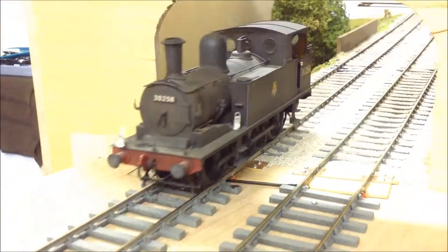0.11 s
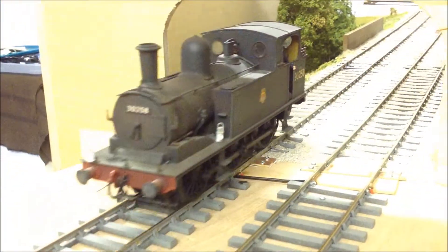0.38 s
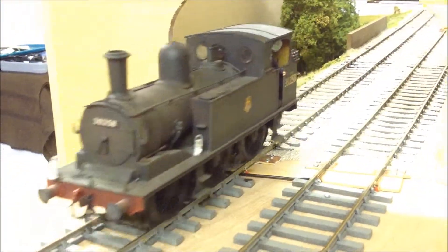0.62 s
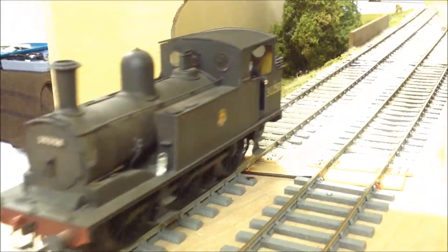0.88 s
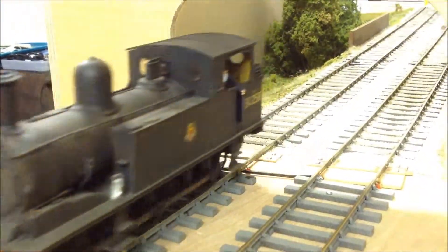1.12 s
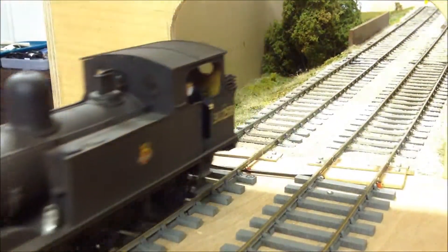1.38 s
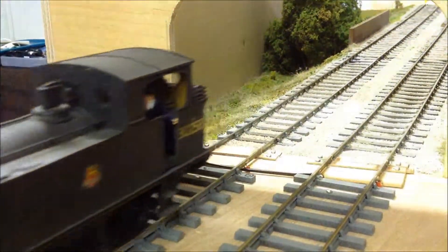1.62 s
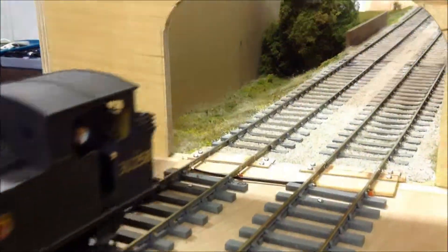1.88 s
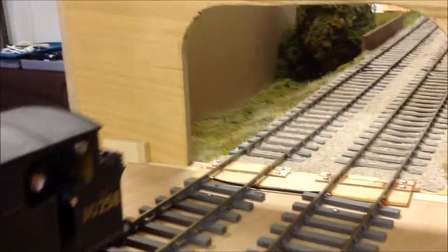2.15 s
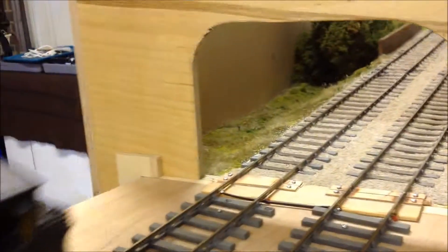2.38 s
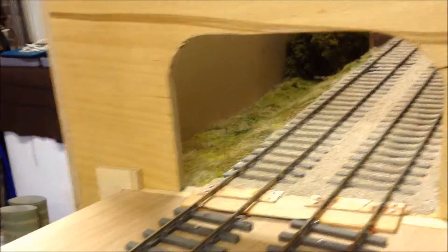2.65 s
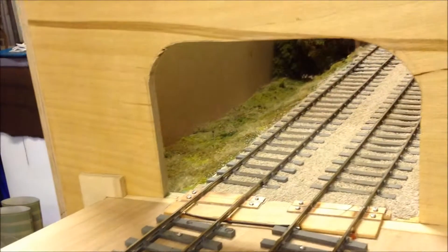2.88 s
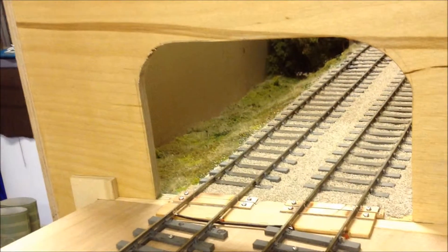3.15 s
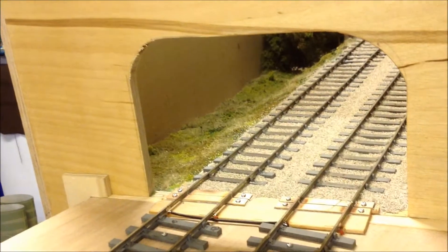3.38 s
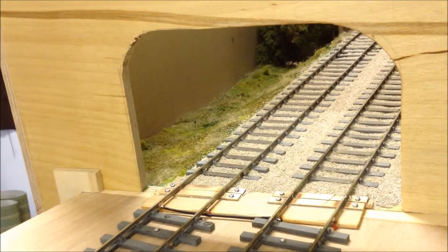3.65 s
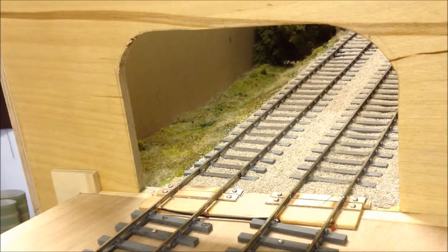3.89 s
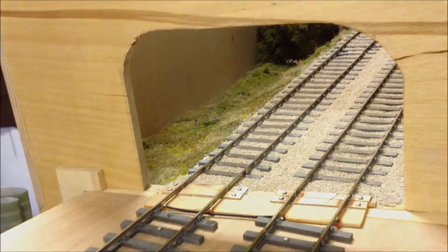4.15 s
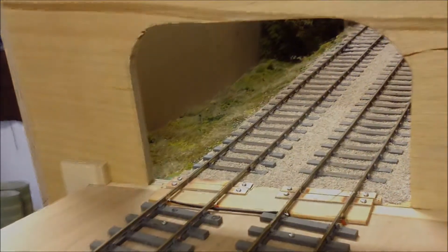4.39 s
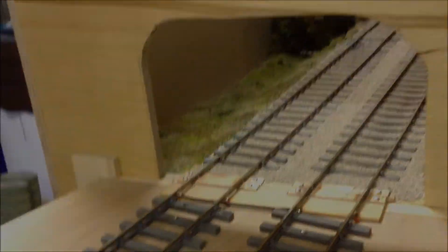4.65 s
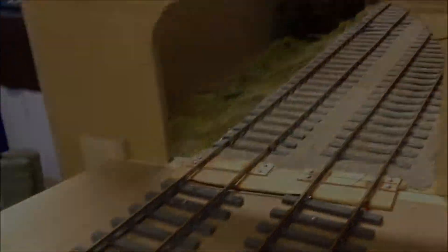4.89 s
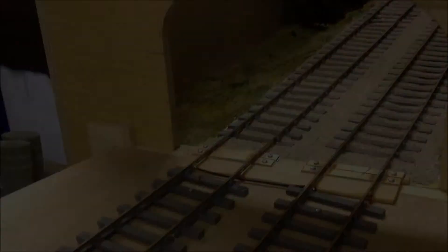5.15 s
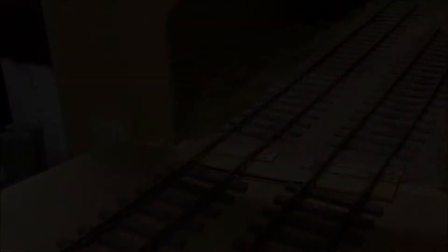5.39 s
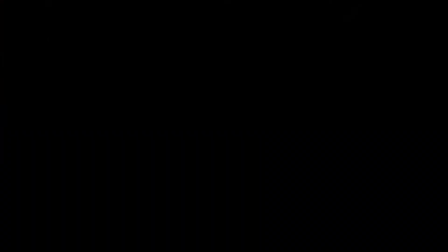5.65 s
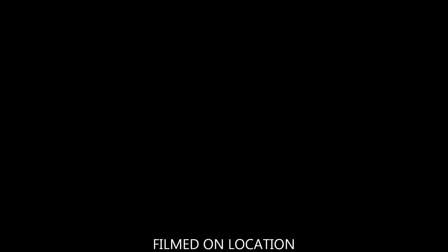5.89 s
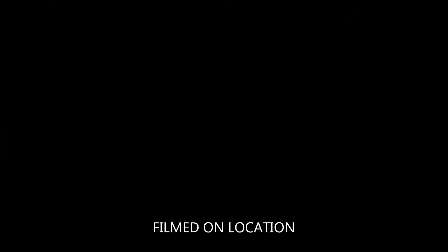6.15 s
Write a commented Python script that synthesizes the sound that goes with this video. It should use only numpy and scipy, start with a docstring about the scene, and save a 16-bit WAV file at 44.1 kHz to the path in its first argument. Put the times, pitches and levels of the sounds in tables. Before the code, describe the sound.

A small model locomotive rumbles close by on hollow wooden boards, wheels clicking over rail joints with brief thin squeals, then fades and cuts to silence.

```python
"""On a plywood layout, a small model locomotive rolls past close to a camera.
Its motor knocks make the boards throb and boom; its metal wheels are noise that rings at their own pitches.
Sine tones make the squeals and whines, and short noise bursts make the clicks at rail joints.
A low hum of sine waves, soft scuffs, treble hiss and room boom lie behind.
The sound fades and is then cut off."""
import sys
import numpy as np
from scipy import signal
from scipy.fft import rfft, irfft, next_fast_len
from scipy.io import wavfile
from scipy.ndimage import uniform_filter1d, map_coordinates

SR = 44100
rng = np.random.default_rng(int(sys.argv[2]) if len(sys.argv) > 2 else 0)


def file_out(sig):
    """Save sig as 16-bit WAV at sys.argv[1]."""
    # one column per channel
    cols = np.atleast_2d(sig).T
    # limit, then scale
    lim = np.clip(cols, -1, 1)
    pcm = np.round(lim * 32767).astype(np.int16)
    wavfile.write(sys.argv[1], SR, pcm)


def gain_from_db(level_db):
    """Turn a decibel level (scalar or array-like) into a linear amplitude factor."""
    decades = np.asarray(level_db, float) / 20
    return 10 ** decades


N = 276948  # length in samples

# how strongly the engine is heard as it nears, passes and leaves:
# (t/s, level/dB of the rolling noise between 800 and 2200 Hz)
PASSING = [(0.0, -57.5), (0.28, -57.5), (0.39, -55.5), (0.89, -57.5), (1.28, -58), (1.53, -59),
           (1.88, -56.5), (2.19, -54), (2.36, -56.5), (2.58, -52.5), (2.84, -53), (3.03, -54), (3.34, -56),
           (3.8, -52.5), (4.33, -60.5), (5.55, -65)]


def unit(x):
    """Scales a sound to rms 1."""
    return x / np.sqrt(np.mean(x ** 2) + 1e-20)


def along(points, hz):
    """Reads a curve of (f/Hz, value) points, with frequency on a log axis."""
    f, v = np.transpose(points)
    return np.interp(np.log(hz + 1), np.log(f + 1), v)


def curves(rows):
    """Gives one value per sample for each column after the time."""
    times, *columns = np.transpose(rows)
    return [np.interp(np.arange(N) / SR, times, column) for column in columns]


def wobble(rate):
    """A smooth random curve through rate random points a second."""
    points = rng.standard_normal(int(N * rate / SR) + 4)
    return map_coordinates(points, [np.arange(N) * rate / SR])


def filtered(x, response):
    """Changes each frequency of x by a response, a function of frequency in Hz."""
    m = next_fast_len(N + SR // 2)
    return irfft(rfft(x, m) * response(np.fft.rfftfreq(m, 1 / SR)), m)[..., :N]


def modes(table):
    """Response of objects that ring at (f/Hz, width/Hz, gain/dB), with alternating signs."""
    def response(f):
        total = 0
        for k, (centre, width, db) in enumerate(table):
            total = total + (-1) ** k * gain_from_db(db) * 1j * f * width / (centre * centre - f * f + 1j * f * width)
        return total
    return response


def unit_in(x, low_hz, high_hz):
    """Scales a sound so that one frequency band has rms 1."""
    return x / np.std(filtered(x, lambda f: (f > low_hz) & (f < high_hz)))


def patchy(patchy_db):
    """White noise whose strength varies in random patches of time and frequency."""
    z = signal.stft(rng.standard_normal(N), nperseg=512)[2]
    patches = uniform_filter1d(rng.standard_normal(z.shape), 5, 0)
    patches = uniform_filter1d(patches, 8, 1)
    return signal.istft(z * gain_from_db(patchy_db * unit(patches)), nperseg=512)[1][:N]


def follows(db, slope):
    """Level in dB that swings with the pass: db at a rolling level of -57 dB, slope dB per dB around it."""
    return db + slope * (curves(PASSING)[0] + 57)


def bump(middle, length):
    """A smooth swell from 0 to 1 and back."""
    return np.cos(np.pi * np.clip((np.arange(N) / SR - middle) / length, -.5, .5)) ** 2


def room(x):
    """The room answers with a noise tail in which each frequency dies at its own speed."""
    # time to fall by 60 dB: (f/Hz, t60/s)
    decay_times = [(200, 0.92), (2000, 0.37), (10000, 0.054)]
    hz, t, z = signal.stft(rng.standard_normal(SR // 2), SR, nperseg=256)
    fall = gain_from_db(-60 * t / along(decay_times, hz)[:, None])
    tail = signal.istft(z * fall, SR, nperseg=256)[1]
    delayed = np.pad(x, (200, 0))  # 200 samples late
    return signal.fftconvolve(delayed, tail / np.linalg.norm(tail))[:N]


def hum():
    """A low buzz: sine waves at multiples of one pitch, each slightly unsteady, rise and fall with the pass."""
    # mix of the sine waves: (multiple of 49 Hz, relative level/dB)
    multiples = [(1, -37), (2, -18), (3, -4.5), (4, 2.5), (5, 5.5), (6, -0.5), (7, -7), (8, 6.5), (9, 1.5),
                 (10, -14.5), (11, 7.5), (12, 3.5), (13, 3), (14, -13.5), (15, -22), (16, -32.5), (17, -14),
                 (18, -11)]
    phase = 2 * np.pi * 49 * np.arange(N) / SR
    lines = np.zeros(N)
    for k, db in multiples:
        lines += gain_from_db(db + 1.0 * wobble(1.5)) * np.sin(k * phase + rng.uniform(0, 2 * np.pi))
    return gain_from_db(follows(-55, 0.44)) * unit(lines)


def room_boom():
    """Low noise wavers in level and swells gently with the pass."""
    # colour of the boom: (f/Hz, relative level/dB)
    boom_colour = [(15, -61.5), (25, -34.5), (38, -30.5), (64, -6.5), (97, -0.5), (130, 0), (170, -29.5),
                   (290, -120)]
    boom = filtered(rng.standard_normal(N), lambda f: gain_from_db(along(boom_colour, f)))
    return gain_from_db(follows(-73, 0.49) + 2.5 * wobble(5.9)) * unit(boom)


def treble_hiss(sizzle):
    """Flickering high noise follows the pass and gains strength while a wheel drags."""
    # colour of the hiss: (f/Hz, relative level/dB)
    hiss_colour = [(2940, -28.5), (5000, -30.5), (7040, -12), (8930, -8.5), (9630, -4), (13400, -0.5),
                   (15300, -3)]
    flickering = patchy(patchy_db=-0.6) * gain_from_db(1.1 * wobble(300))
    hiss = filtered(flickering, lambda f: gain_from_db(along(hiss_colour, f)))
    return (gain_from_db(follows(-69, 0.41)) + sizzle) * unit_in(hiss, 10600, 12200)


def scuffs():
    """Short brushes of noise with a quick rise and a slower fall."""
    # soft scuffs: (t/s, length/s, middle level/dB, treble level/dB)
    brushes = [(0.233, .12, -59, -67.5), (3.202, 0.09, -51.5, -46), (4.71, 0.15, -57, -58.5),
               (4.5, 0.036, -61, -62.5), (1.79, .05, -54, -68.5), (2.04, 0.1, -51, -60.5)]
    t, levels = np.arange(N) / SR, np.zeros((2, N))
    for start, length, *levels_db in brushes:
        u = np.clip((t - start) / length, 0, None) * 4  # the peak comes at u = 1
        levels += gain_from_db(np.array(levels_db))[:, None] * u * np.exp(1 - u)
    middle = unit(filtered(patchy(patchy_db=-3.5), modes([(2365, 520, 3.0), (4490, 4800, -7.5)])))
    treble = unit(filtered(patchy(patchy_db=3.0), lambda f: modes([(12500, 6000, 0)])(f) ** 2))
    return levels[0] * middle + levels[1] * treble


def whines():
    """Thin whines of gears and wheels: sines that swell and die, wavering a little in pitch and strength."""
    # whines before wavering: (start t/s, end t/s, f/Hz, level/dB)
    thin_tones = [(0, 0.08, 1620, -62), (.1, 0.616, 993, -63), (0.89, 1.136, 201, -58),
                  (1.113, 1.485, 1614, -60), (1.15, 1.599, 3670, -69.5), (1.18, 1.556, 6200, -61.5),
                  (2.261, 2.363, 950, -75), (2.43, 2.665, 1008, -56.5), (2.8, 3, 3700, -63),
                  (3.694, 3.92, 1080, -59.5), (4.15, 4.604, 1445, -69), (4.253, 4.547, 3700, -75)]
    t, out = np.arange(N) / SR, np.zeros(N)
    for start, end, hz, db in thin_tones:
        progress = np.clip((t - start) / (end - start), 0, 1)
        swell = np.sqrt(np.sin(np.pi * progress).clip(0))
        phase = 2 * np.pi * hz * np.cumsum(1 + 0.0033 * wobble(60)) / SR
        out += gain_from_db(db + 2.1 * wobble(45)) * swell * np.sqrt(2) * np.sin(phase)
    return out


def rolling_noise():
    """Broad, slightly patchy noise of the rolling wheels, at the level of the pass."""
    # colour of the rolling: (f/Hz, relative level/dB)
    rolling_colour = [(82, -40.5), (140, -14.5), (195, -0.5), (391, -2), (412, -9), (526, -2.5), (772, -7),
                      (1450, -11.5), (3220, -20.5), (5240, -24.5), (9000, -27.5), (11700, -46),
                      (19800, -120)]
    roll = filtered(patchy(patchy_db=2.0), lambda f: gain_from_db(along(rolling_colour, f)))
    return gain_from_db(curves(PASSING)[0]) * unit_in(roll, 800, 2200)


def drags():
    """Strength of the extra rub and of the extra treble hiss while a wheel drags."""
    # drags: (middle t/s, length/s, rub level/dB, treble hiss level/dB)
    drag_times = [(.76, 0.25, -61, -68), (1.233, 0.22, -70.5, -71), (1.367, 0.78, -62, -85.5),
                  (1.96, 1, -70.5, -72.5), (2.39, 0.4, -62.5, -69), (2.682, 0.48, -102, -62),
                  (3.211, 0.22, -61.5, -68.5), (4.01, 0.45, -67.5, -70.5), (4.3, 0.67, -90, -73.5),
                  (4.776, 0.54, -90, -65.5), (5.004, .5, -99, -76)]
    strengths = np.zeros((2, N))
    for middle, length, rub_db, hiss_db in drag_times:
        strengths += gain_from_db([[rub_db], [hiss_db]]) * bump(middle, length)
    return strengths


def rubbing(drag):
    """Gritty rubbing noise rings the wheels and one thin rim tone; a dragging wheel strengthens both."""
    # wheel resonances: (f/Hz, width/Hz, relative gain/dB)
    wheel_modes = [(1430, 61, 1), (1620, 7.5, 8), (2479, 94, 3), (3680, 50, -4), (3920, 140, -8.5),
                   (5126, 410, -1.5), (6295, 430, -3.5), (9870, 170, -7)]
    rub = filtered(patchy(patchy_db=3) * gain_from_db(1.3 * wobble(60)), modes(wheel_modes))
    rim = filtered(patchy(patchy_db=6.5), modes([(3700, 76, 0)]))
    rub_level = gain_from_db(follows(-71, 1.05)) + drag
    rim_level = gain_from_db(follows(-72.5, 1.4)) + gain_from_db(-12.5) * drag
    return rub_level * unit_in(rub, 5700, 6800) + rim_level * unit(rim)


def boards():
    """The motor knocks the plywood: two board resonances all along, and loose stretches that boom up in passing."""
    # motor speed before a slight waver: (t/s, knock rate f/Hz)
    motor_speed = [(0, 49.66), (1.55, 49.3), (1.72, 52.5), (1.9, 49.73), (2.43, 49.6), (2.7, 51.7),
                   (2.95, 49.9), (3.68, 50.23), (3.9, 48.36), (3.98, 49.93), (4.13, 49), (5.7, 49)]
    # loose boards under the engine: (middle t/s, length/s, level/dB, resonance f/Hz)
    loose_boards = [(.1, 0.74, -61.5, 158), (0.278, 0.093, -48, 418), (0.616, 0.29, -53.5, 207),
                    (0.844, 0.19, -53, 320), (1.002, .3, -64, 190), (1.78, 0.31, -55, 212),
                    (2.0, 0.61, -49.5, 236), (2.265, .12, -49, 570), (2.6, 0.51, -41, 535),
                    (2.617, 0.21, -50, 270), (2.823, 0.28, -55, 505), (2.912, .1, -44, 460),
                    (2.96, 0.86, -49, 290), (2.951, 1, -58, 200), (3.196, 0.25, -46.5, 272),
                    (3.621, 1, -53, 240), (3.722, 0.59, -57, 395), (3.785, 0.34, -45.5, 560),
                    (4.074, 0.12, -51, 315)]
    deep_hz, upper_hz = 253, 454
    turns = np.cumsum(curves(motor_speed)[0] * (1 + .003 * wobble(12))) / SR
    new_turn = np.diff(np.floor(turns), prepend=0) > 0
    knocks = unit(new_turn * gain_from_db(1.2 * wobble(43)))
    knock_share = .85  # the rest of the driving power is patchy noise
    drive = np.sqrt(knock_share) * knocks + np.sqrt(1 - knock_share) * patchy(patchy_db=5.0)

    def ring(hz, width_hz):
        return unit(filtered(drive, lambda f: 1 / (1 + (2 * (f - hz) / width_hz) ** 2) ** 2))

    out = gain_from_db(follows(-64.5, 1.5) + 1.5 * wobble(7)) * ring(deep_hz, width_hz=150)
    out += gain_from_db(follows(-61.5, 1.6) + 1.5 * wobble(7)) * ring(upper_hz, width_hz=300)
    for middle, length, db, hz in loose_boards:
        width_hz = np.interp(hz, [deep_hz, upper_hz], [44, 144])  # higher booms are broader
        out += gain_from_db(db) * bump(middle, length) * ring(hz, width_hz)
    return out


def joints():
    """Each wheel drop gives a knock, a thud in the boards, a ring of the rim and a thin spit; a tick is mostly spit."""
    # rail joints, strength of the blow before it rings: (t/s, knock/dB, thud/dB, ring/dB, t60/s)
    rail_joints = [(0.2146, -35.5, -46.5, -43, 0.05), (.6395, -34.5, -60, -49.5, 0.017),
                   (0.657, -35.5, -52.5, -44.5, 0.021), (1.5943, -28.5, -61, -45, 0.01),
                   (1.6166, -15.5, -40.5, -28, 0.031), (1.6844, -49, -46, -63.5, 0.0081),
                   (1.7202, -26, -31.5, -52.5, 0.014), (1.981, -29, -36, -37.5, 0.02),
                   (2.391, -38.5, -47, -48.5, 0.04), (2.737, -39, -40, -60, 0.049),
                   (3.0784, -54, -58, -66, 0.014), (3.1877, -47, -39.5, -54, 0.029),
                   (3.3877, -62, -47.5, -49, 0.024), (3.4697, -60, -72, -70, 0.0084),
                   (3.5501, -36.5, -40.5, -59.5, 0.02), (4.0617, -53, -40.5, -47.5, 0.027),
                   (5.5932, -45, -47.5, -69, 0.014)]
    # thin high ticks, strength before ringing: (t/s, spit/dB)
    thin_ticks = [(1.9573, -40), (2.6392, -53), (4.2643, -55), (4.783, -60)]
    # resonances of the knock, the boards and the rim: each (f/Hz, width/Hz, gain/dB)
    knock_modes = [(970, 170, 9.5), (1350, 160, 16), (1934, 760, 12)]
    board_modes = [(301, 220, 17), (500, 200, 27.5)]
    rim_modes = [(2400, 43, 7), (3580, 950, 17), (5500, 1100, 20.5), (6550, 2700, 14.5)]
    t = np.arange(SR // 5) / SR
    blows = np.zeros((4, N + SR))  # rows: knock, thud, ring, spit
    drops = [(s, [knock, thud, ring, ring - 14], t60) for s, knock, thud, ring, t60 in rail_joints]
    ticks = [(s, [db - 11, db - 3, db - 18.5, db], 0.019) for s, db in thin_ticks]
    for start, levels_db, t60 in drops + ticks:
        burst = rng.standard_normal((4, len(t))) * gain_from_db(-60 * t / max(t60, .004))
        burst[1, 0] += 6 * np.sign(burst[1, 0])  # the boards take one firm push
        first = round(start * SR)
        blows[:, first:first + len(t)] += gain_from_db(np.array(levels_db))[:, None] * burst

    def dull(f):  # softens the treble
        return 1 / (1 + 1j * f / 3000) ** 2

    def high(f, hz):  # thins out what lies below hz
        return (1j * f / hz / (1 + 1j * f / hz)) ** 2

    knock = filtered(blows[0, :N], lambda f: modes(knock_modes)(f) * dull(f) * high(f, 460))
    thud = filtered(blows[1, :N], lambda f: modes(board_modes)(f) * dull(f) * high(f, 100))
    ring = filtered(blows[2, :N], lambda f: modes(rim_modes)(f) * high(f, 2300) / (1 + 1j * f / 8000) ** 2)
    spit = filtered(blows[3, :N], lambda f: modes([(12200, 3500, 8.5)])(f) ** 2)
    return knock + thud + ring + spit


def squeal():
    """A wheel flange sticks and slips at a wheel mode: two clear partials, the higher ones blurred."""
    # the flange grips, often twice in a row: (start t/s, hold/s, level/dB, octave over it/dB)
    grips = [(0.649, 0.015, -47.5, -17), (0.677, 0.0097, -57, 13), (.715, 0.074, -44, -3.5),
             (0.827, 0.042, -56, -3), (1.57, 0.06, -56, -12.5), (1.645, 0.043, -50, -6.5),
             (2.303, 0.041, -40, 2.5), (2.361, 0.078, -34, -8), (2.48, .02, -52.5, -7),
             (2.838, .01, -61, -17.5), (2.909, .01, -57, -26), (3.151, 0.034, -44.5, -7),
             (3.211, 0.013, -47, 5), (3.282, 0.017, -51.5, -23), (3.772, 0.0079, -54.5, -11),
             (3.879, 0.075, -33, -7.5), (3.985, 0.06, -36.5, -7), (4.086, 0.014, -49.5, -3),
             (4.144, 0.038, -60.5, -18)]
    # blurred partials: (multiple of the pitch, level over a shared base/dB, blur in random points per s)
    higher_partials = [(3, -8, 300), (4, -1, 500), (5, -11, 500), (6, -2, 1300)]
    pitch_hz, rise_db_per_s, fall_db_per_s = 2522.5, 330, 378
    t = np.arange(N) / SR
    flutter, drift = wobble(120), wobble(150)
    start, hold, db, octave_over_db = np.transpose(grips)[:, :, None]
    rise_db = rise_db_per_s * (start - t).clip(0)
    fall_db = fall_db_per_s * (t - start - hold).clip(0)
    grip_db = db - rise_db - fall_db
    level_db = grip_db.max(axis=0)  # the strongest grip wins
    # the overtones die faster than the tone
    octave_db = (grip_db + octave_over_db + .6 * (grip_db - db)).max(axis=0)
    phase = 2 * np.pi * np.cumsum(pitch_hz + 6 * drift) / SR
    # a weak squeal stutters, a strong one holds
    shake_db = flutter * np.interp(level_db, [-52, -36], [2.6, 1.1])
    tone = gain_from_db(level_db + shake_db) * np.sin(phase)
    tone += gain_from_db(octave_db + 0.49 * shake_db) * np.sin(2 * phase)
    # above an octave level of -50 dB the higher partials lose this share of the growth
    squeeze = 0.28
    base_db = octave_db - 8 - squeeze * (octave_db + 50).clip(0)
    for k, over_db, blur_rate in higher_partials:
        blur = unit(wobble(blur_rate) + 0.099)
        tone += gain_from_db(base_db + over_db) * blur * np.sin(k * phase)
    return np.sqrt(2) * tone


def scene():
    """Clicks and squeals ring in the room over the hum, noise, whines and throbbing boards."""
    drag, sizzle = drags()
    background = hum() + room_boom() + treble_hiss(sizzle) + scuffs() + whines()
    engine = rolling_noise() + rubbing(drag) + boards()
    clicks, whistle = joints(), squeal()
    echo = room(gain_from_db(-8.5) * clicks + gain_from_db(-21) * whistle)
    return (background + engine + clicks + whistle + echo)[None]


def low_pass(x):
    """Removes everything above the highest recorded frequency."""
    return signal.sosfilt(signal.butter(12, 15980, fs=SR, output="sos"), x)


def record(dry):
    """The camera weakens the lowest bass and drops all above its band limit; the sound is then cut off."""
    top_hz, bass_hz, end_s, cut_s = 15350, 40, 5.712, 0.0045
    cut = np.clip((end_s - np.arange(N) / SR) / cut_s, 0, 1)
    heard = filtered(dry, lambda f: (f < top_hz) * (1j * f / bass_hz / (1 + 1j * f / bass_hz)))
    return low_pass(heard * cut)


dry = scene()
out = record(dry)
file_out(out)
```